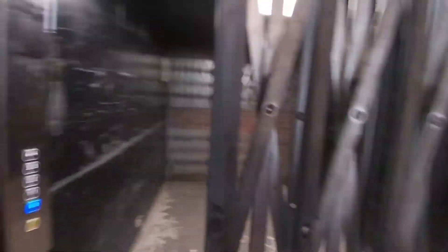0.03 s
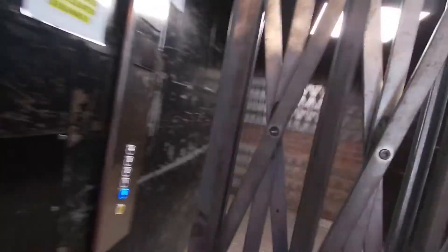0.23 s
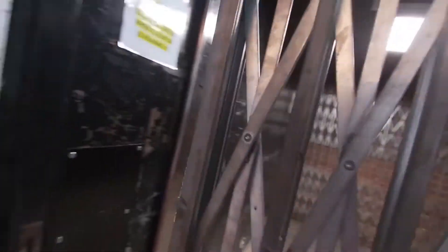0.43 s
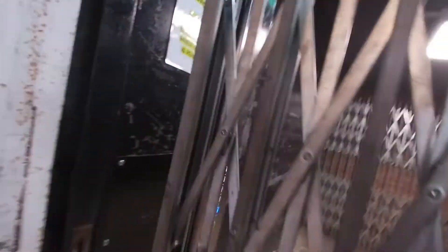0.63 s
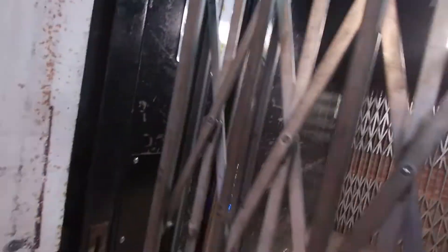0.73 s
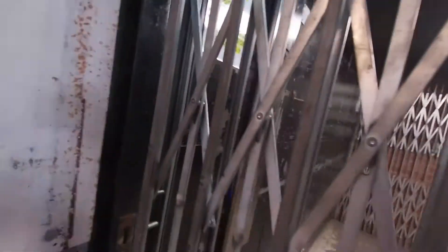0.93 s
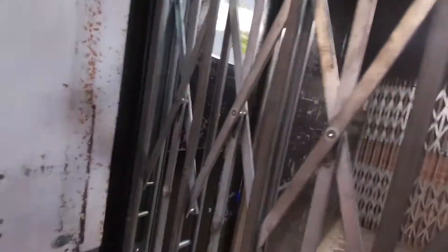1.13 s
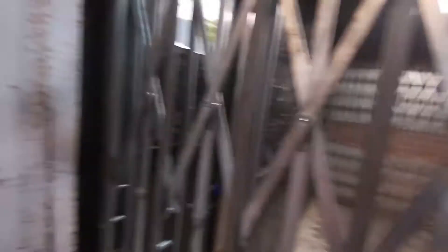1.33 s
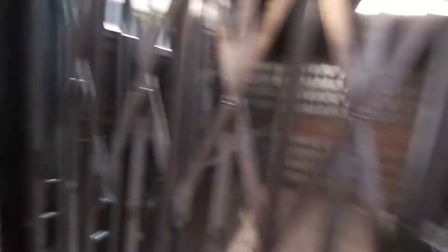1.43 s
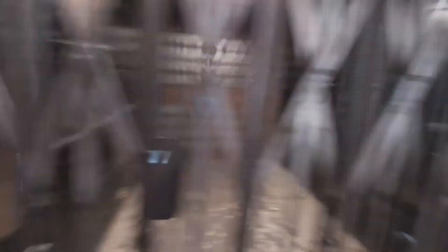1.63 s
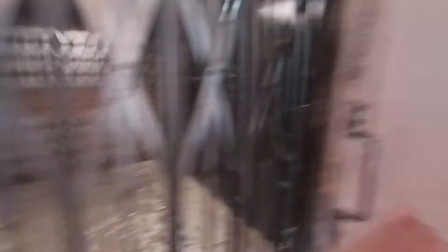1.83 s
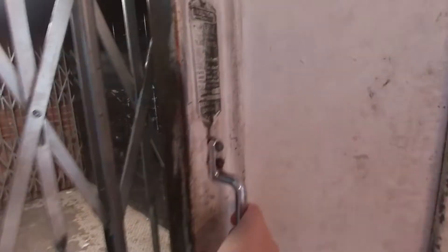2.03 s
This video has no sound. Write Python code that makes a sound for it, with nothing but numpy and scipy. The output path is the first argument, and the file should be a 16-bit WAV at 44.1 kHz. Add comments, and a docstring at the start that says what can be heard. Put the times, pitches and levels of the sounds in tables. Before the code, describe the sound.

A folding metal gate rattles along its track, then slams shut with a loud, echoing clang.

```python
"""A folding steel lattice gate is pulled along its track and slammed, close by in a hard, echoing hall.
Its loose bars chatter and its joints clink, while the runners rumble, grind and squeak on the track.
It knocks as it stretches out, then hits the frame with a crack: the lattice clangs, the frame booms,
and the hall rings on over a low background rumble."""
import sys
import numpy as np
from scipy import signal
from scipy.fft import rfft, irfft, next_fast_len
from scipy.io import wavfile
from scipy.ndimage import uniform_filter1d

SR = 44100
rng = np.random.default_rng(int(sys.argv[2]) if len(sys.argv) > 2 else 0)


def dump(signal):
    """Clip the signal to [-1, 1] and save it as 16-bit WAV at the path in sys.argv[1]."""
    limited = np.clip(np.atleast_2d(signal).T, -1, 1)
    pcm = np.round(limited * 32767).astype(np.int16)
    wavfile.write(sys.argv[1], SR, pcm)


N = 92610
T = np.arange(N) / SR
SLAM_S = 1.110  # when the gate hits the frame


def amp(db):
    """Turn decibels into a number to multiply a sound by."""
    return 10 ** (np.asarray(db) / 20)


def unit(x):
    """Scale a sound so that its average (rms) level is 1."""
    return x / np.sqrt(np.mean(x ** 2))


def noise():
    """White noise: an even hiss."""
    return rng.standard_normal(N)


def at_pitch(hz, points):
    """Look up a value by pitch, sliding smoothly between the rows of a table."""
    pitches, values = np.array(points, float).T
    return np.interp(np.log(np.maximum(hz, 1)), np.log(pitches), values)


def colour(x, points):
    """Make some pitches stronger and others weaker; white noise keeps its overall level."""
    size = next_fast_len(2 * N, True)
    gain = unit(amp(at_pitch(np.fft.rfftfreq(size, 1 / SR), points)))
    # These steps make the filter ring only after a hit, never before it.
    cepstrum = irfft(np.log(gain), size)
    cepstrum[1:size // 2] *= 2
    cepstrum[size // 2 + 1:] = 0
    return irfft(rfft(x, size) * np.exp(rfft(cepstrum)), size)[:N]


def fade(start, ring_s, hold_s=0):
    """Switch on, hold, then die away. The ring time, ring_s, is how long a fall of 60 dB takes."""
    return (T >= start) * np.exp(-np.log(1000) * np.maximum(T - start - hold_s, 0) / ring_s)


def rise(start, rise_s):
    """A level that builds from 0 towards 1."""
    return 1 - np.exp(-np.maximum(T - start, 0) / rise_s)


def swell(peak_s, half_length_s):
    """A level that grows and shrinks in a bell shape."""
    return np.exp(-.5 * ((T - peak_s) / half_length_s) ** 2)


def pull(levels):
    """Follow a table of levels while the gate moves, and die away quickly at the slam."""
    return amp(np.interp(T, *np.array(levels).T)) * fade(0, ring_s=0.15, hold_s=SLAM_S)


def resonate(x, hz, width_hz):
    """Let through only a narrow band around one pitch."""
    return signal.lfilter(*signal.iirpeak(hz, hz / width_hz, SR), x)


def ring_out(x, start, ring_times, hold_s=0):
    """Let each octave of a sound die away at its own speed."""
    spectrum, pitches = rfft(x), np.fft.rfftfreq(N, 1 / SR)
    octaves_hz = 125 * 2. ** np.arange(8)
    total = 0
    for hz in octaves_hz:
        share = at_pitch(pitches, list(zip(octaves_hz, octaves_hz == hz)))
        total += irfft(spectrum * share, N) * fade(start, at_pitch(hz, ring_times), hold_s)
    return total


def contacts(per_s):
    """Tiny hits at random moments, all of nearly the same strength."""
    strength = amp(-0.5 * np.minimum(rng.exponential(size=N), 5))
    return unit((rng.random(N) < per_s / SR) * strength * np.sign(noise()))


def bursts(hits):
    """Each harsh hit is a burst of noise that dies away."""
    power = sum((amp(db) * fade(start, ring_s)) ** 2 for start, db, ring_s in hits)
    return noise() * np.sqrt(power)


def tone(start, hz, db, ring_s, hold_s=0):
    """One of the natural notes of struck metal."""
    age = T[:max(N - int(start * SR), 0)]
    attack = np.minimum(age / 0.00087, 1)  # the blow takes a moment to set the note going
    decay = np.exp(-np.log(1000) * np.maximum(age - hold_s, 0) / ring_s)
    wave = np.sin(2 * np.pi * (hz * age + rng.random()))
    return np.pad(amp(db) * attack * decay * wave, (N - len(age), 0))


def struck(hits, notes):
    """Every hit rings the same notes, each time with slightly different tuning and strength."""
    detune, spread_db = .003, 2.5
    total = 0
    for start, hit_db, _ in hits:
        nudges = rng.uniform(-1.1, 1, (len(notes), 2))
        for (hz, note_db, ring_s), (pitch_nudge, level_nudge) in zip(notes, nudges):
            db = hit_db + note_db + spread_db * level_nudge
            total += tone(start, hz * (1 + detune * pitch_nudge), db, ring_s)
    return total


def background():
    """The low, steady rumble of the building."""
    # Each row: pitch in Hz, relative level in dB.
    rumble_colour = [(20, 0.5), (40, 0.5), (70, 2), (110, -4), (200, -8.5), (320, -14), (500, -24.5),
                     (800, -33.5), (1700, -37), (2600, -41.5), (5000, -51), (7000, -71.5), (16000, -94)]
    return amp(-36.5) * unit(colour(noise(), rumble_colour))


def hall(x):
    """Hard walls throw the sound back as a smooth echo; the treble from about 6 kHz up dies far sooner than the
    lower pitches."""
    # Each row: pitch in Hz, ring time in seconds.
    ring_times = [(200, 1.2), (1000, 0.75), (3000, 1.1), (6000, 0.24), (12000, 0.42)]
    echo = ring_out(noise(), 0, ring_times) * rise(0, rise_s=0.016)
    return signal.fftconvolve(x, echo / np.sqrt(np.sum(echo ** 2)))[:N]


def settling():
    """The gate taps faintly as it settles."""
    # Each row: start in seconds, level in dB, ring time in seconds.
    taps = [(1.825, -60, 0.25), (1.948, -52.5, 0.17), (2.09, -68, 0.18)]
    # Each row: pitch in Hz, relative level in dB.
    tap_colour = [(100, 1), (500, 2), (1500, 4), (2600, -11), (5000, -14.5), (7000, -33), (16000, -51.5)]
    return colour(bursts(taps), tap_colour)


def runners():
    """The runners rumble along the track and now and then give a thin squeak."""
    # Each row: time in seconds, level in dB.
    rumble_levels = [(0, -30), (.13, -30.5), (.19, -25.5), (.3, -30), (.41, -26.5), (.52, -34), (.64, -33),
                     (.72, -34.5), (.8, -29.5), (.9, -38), (1.08, -35.5)]
    # Each row: pitch in Hz, relative level in dB.
    rumble_colour = [(20, -17), (40, -2.5), (70, 1.5), (92, -0.5), (115, 8), (135, -9), (165, -1),
                     (200, -14.5), (270, -6.5), (400, -19.5), (800, -20.5), (4000, -96.5)]
    # Each row: loudest moment in seconds, half length in seconds, pitch in Hz, level in dB.
    squeaks = [(0.173, 0.04, 14640, -47), (.495, .04, 11950, -53.5), (0.857, 0.012, 12000, -51)]
    rolling = unit(colour(noise(), rumble_colour)) * pull(rumble_levels)
    for peak_s, half_length_s, hz, db in squeaks:
        band = resonate(noise(), hz, width_hz=45)
        whistle = unit(resonate(band, hz, width_hz=45))
        rolling += amp(db) * whistle * swell(peak_s, half_length_s)
    return rolling


def grinding():
    """A runner jams for a moment and judders along, quickly sticking and slipping."""
    # Each row: loudest moment in seconds, half length in seconds, relative level in dB.
    grinds = [(0.236, 0.019, -32.5), (0.354, 0.0194, -28.5)]
    # Each row: pitch in Hz, relative level in dB.
    grind_colour = [(300, -1.5), (950, -8), (1270, 7.5), (1600, -10), (2600, -3.5), (3420, -2.5),
                    (3900, -4.5), (4500, -2.5), (6000, -4.5), (9000, -23.5), (16000, -50)]
    level = sum(amp(db) * swell(peak_s, half_length_s) for peak_s, half_length_s, db in grinds)
    wobble = unit(uniform_filter1d(noise(), size=441))
    slips_per_s = 110 * np.exp(0.59 * wobble)
    progress = np.cumsum(slips_per_s) / SR % 1  # runs from 0 to 1 between slips
    judder = np.exp(-progress / 0.39)
    return colour(unit(noise() * judder) * level, grind_colour)


def scraping():
    """Many tiny hits in the track blend into a bright scrape, with sharp clicks from the joints."""
    # Each row: time in seconds, relative level in dB.
    scrape_levels = [(0, -42.5), (.15, -37.5), (.25, -33.5), (.44, -33.5), (.58, -30.5), (.67, -44.5),
                     (.74, -34.5), (.8, -45), (.9, -33.5), (1.08, -50.5)]
    # Each row: pitch in Hz, relative level in dB.
    scrape_colour = [(1000, -27.5), (4000, -3.5), (5800, -2.5), (7500, -4), (8700, -7.5), (9900, -10.5),
                     (10600, -18), (12500, -27.5), (15000, -38), (16000, -55)]
    # Joints snapping tight. Each row: start in seconds, relative level in dB.
    snaps = [(0.24, -27), (0.324, -29.5), (0.381, -30.5), (0.4288, -27), (0.529, -29), (0.617, -26.5),
             (0.653, -24), (0.6844, -21), (0.7054, -21.5), (0.731, -27.5), (0.769, -28.5), (0.789, -32),
             (0.81, -27.5), (0.87, -33)]
    clicks = [(start, db, 0.06) for start, db in snaps]  # add a ring time in seconds
    scrape = contacts(per_s=1200) * pull(scrape_levels) * amp(-3)
    return colour(scrape + bursts(clicks), scrape_colour), clicks


def chattering():
    """Loose bars rattle at their rivets."""
    # Each row: time in seconds, relative level in dB.
    chatter_levels = [(0, -34), (.11, -33), (.235, -28.5), (.29, -33), (.35, -30.5), (.47, -31.5),
                      (.62, -33.5), (.77, -31), (.87, -33.5), (1.08, -31.5)]
    # Each row: pitch in Hz, relative level in dB.
    chatter_colour = [(150, -9), (450, 2.5), (700, -6), (1100, 0.5), (1600, 0), (1950, -3), (2300, 0),
                      (3000, -4), (4300, -3), (5200, -10), (8500, -16), (11000, -38), (16000, -37)]
    return colour(contacts(per_s=1400) * pull(chatter_levels), chatter_colour)


def singing_bars():
    """Now and then a click leaves a bar ringing on one note."""
    # Each row: start in seconds, pitch in Hz, level in dB, ring time in seconds.
    notes = [(0.326, 3420, -32.5, 0.27), (0.336, 1261, -33, 0.19), (0.479, 917, -33.5, 0.54),
             (0.722, 918, -35, 0.7)]
    return sum(tone(*note) for note in notes)


def shaken_bars(x):
    """The bars add their own ring to whatever shakes them."""
    # Each row: pitch in Hz, width in Hz, level in dB compared with the shaking.
    resonances = [(920, 74, -7), (2124, 34.8, -5.5), (3420, 54, -6.5), (5280, 46, -8), (5600, 40, -10),
                  (8530, 190, -3.5)]
    return x + sum(amp(db) * resonate(x, hz, width_hz) for hz, width_hz, db in resonances)


def sliding():
    """The pull shakes the bars, the joints clink tight and the lattice knocks as it stretches out."""
    # A joint's clink. Each row: pitch in Hz, level in dB added to the click's, ring time in seconds.
    joint_notes = [(4214, -17.5, 0.19), (5270, -19, .15), (5787, -16.5, .38), (7250, -22, .25),
                   (8460, -16.5, .25)]
    # Each row: start in seconds, relative level in dB, ring time in seconds.
    knocks = [(1.003, -20.5, .07), (1.009, -21.5, 0.087), (1.027, -28, .11), (1.048, -33, .11),
              (1.058, -28, 0.068)]
    # Each row: pitch in Hz, relative level in dB.
    knock_colour = [(100, -21.5), (700, -4), (920, 6.5), (1300, -4.5), (1800, 2), (2650, -0.5),
                    (3400, -12.5), (4450, 2), (5400, -9), (8500, -14), (10000, -13.5), (10800, -29),
                    (16000, -48)]
    # Each row: pitch in Hz, level in dB added to the knock's, ring time in seconds.
    lattice_notes = [(915, -11.5, .12), (1773, -14, .1), (2433, -16, .22), (2692, -12, .08),
                     (4440, -2, .06)]
    chatter = chattering()
    scrape, clicks = scraping()
    shaking = chatter + scrape + grinding() + colour(bursts(knocks), knock_colour)
    return amp(-2) * shaken_bars(shaking) + struck(clicks, joint_notes) + struck(knocks, lattice_notes)


def frame_boom():
    """The frame jolts and booms on its strongest note, then shudders on low notes as the thud lingers."""
    # Each row: pitch in Hz, relative level in dB.
    thud_colour = [(20, -6.5), (40, -3.5), (62, -5), (85, -0.5), (115, 4.5), (165, -2), (250, -7.5),
                   (350, -14), (520, -21), (1000, -40.5), (4000, -79.5)]
    # Each row: pitch in Hz, level in dB, ring time in seconds.
    low_notes = [(57.1, -28.5, 1.56), (113.9, -25, 1.0), (122, -31, 1.55), (164.2, -32, 0.69),
                 (250, -36, 1.03), (336.7, -37.5, 1.2)]
    jolt_hz, boom_hz = 40.9, 112.2
    age = T - SLAM_S
    jolt = np.sin(2 * np.pi * jolt_hz * age) * fade(SLAM_S, ring_s=0.1)
    boom_shape = rise(SLAM_S, rise_s=0.0057) * fade(SLAM_S, ring_s=0.11, hold_s=0.064)
    boom = np.sin(2 * np.pi * boom_hz * age) * boom_shape
    thud = unit(colour(noise(), thud_colour)) * fade(SLAM_S, ring_s=1.42, hold_s=0.17)
    shudder = sum(tone(SLAM_S, *note, hold_s=0.29) for note in low_notes) * rise(SLAM_S, rise_s=.06)
    return amp(-9) * jolt + amp(-13.5) * boom + amp(-23) * thud + shudder


def slam_crack():
    """Steel hits steel as the gate slams and bounces."""
    # Each row: start in seconds, level in dB, ring time in seconds.
    hits = [(1.102, -30.5, 0.039), (1.110, -5, 0.025), (1.114, -14, 0.11), (1.292, -36, 0.14)]
    # Each row: pitch in Hz, relative level in dB.
    crack_colour = [(100, -10), (700, -9.5), (1400, 2), (3000, -1.5), (5000, 2.5), (6600, 3.5), (8500, -1),
                    (10200, 0), (11500, -13), (14500, -30.5), (16000, -27.5)]
    return colour(bursts(hits), crack_colour)


def lattice_clang():
    """The slam spreads through the lattice: a wash of close notes swells and dies, and a few stand out."""
    # Each row: pitch in Hz, relative level in dB.
    wash_colour = [(100, -25.5), (400, -5), (650, -3.5), (1000, -6.5), (1600, -4), (2100, -1), (3000, 2.5),
                   (4200, -1), (5200, -2.5), (6300, -7.5), (8700, -10.5), (10000, -19.5), (11500, -29.5),
                   (15000, -39.5), (16000, -52.5)]
    # Each row: pitch in Hz, ring time in seconds.
    ring_times = [(300, 0.85), (1000, 1.0), (2000, 0.67), (4000, 0.65), (8000, 0.52), (14000, 0.43)]
    # Each row: pitch in Hz, relative level in dB, ring time in seconds.
    clear_notes = [(904, -9, 1.0), (1884, -8, .6), (2266, -3, .5), (2444, -5, .55), (2665, 2, .6),
                   (2879, -1, .56), (3129, -4, .5), (3331, -5, .5), (3378, -3, .5), (4170, -4, .88),
                   (4319, -4, .75), (5037, -6, .62), (7699, -7, .42), (8181, -6, .38)]
    hold_s = 0.054
    wash = ring_out(unit(colour(noise(), wash_colour)), SLAM_S, ring_times, hold_s)
    ringing = sum(tone(SLAM_S, *note, hold_s) for note in clear_notes)
    return (amp(-17) * wash + amp(-30.5) * ringing) * rise(SLAM_S, rise_s=0.015)


def scene():
    """The pull, the slam, their echo and the building's rumble, the same in both channels."""
    slide = sliding()
    slam = lattice_clang() + slam_crack()
    echo = hall(amp(-4.5) * slide + amp(-18.5) * slam)
    mono = echo + background() + singing_bars() + settling() + runners() + slide + frame_boom() + slam
    return np.array([mono, mono])


def record(dry):
    """The microphone rounds off the peak of the slam, and the very highest pitches are cut."""
    ceiling, top_hz = 1.1, 15500
    rounded = dry / (1 + (dry / ceiling) ** 4) ** .25
    return signal.sosfilt(signal.ellip(8, .2, 80, top_hz, fs=SR, output="sos"), rounded)


dry = scene()
out = record(dry)
dump(out)
```